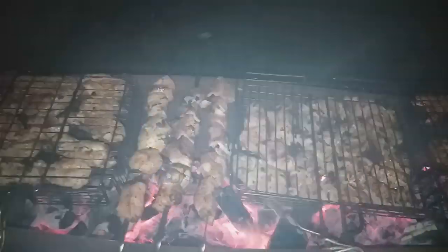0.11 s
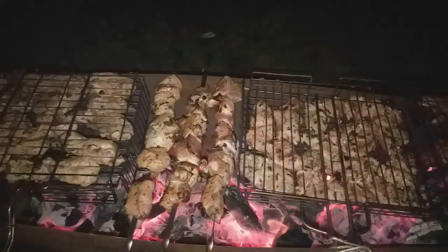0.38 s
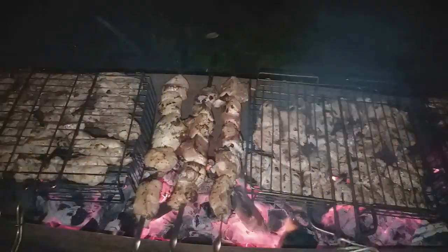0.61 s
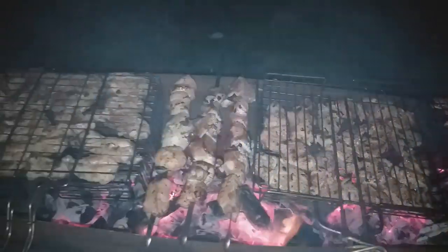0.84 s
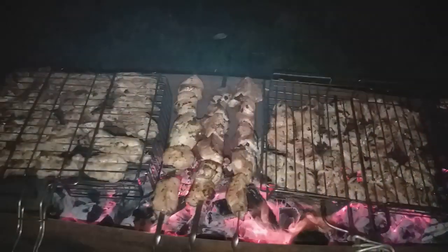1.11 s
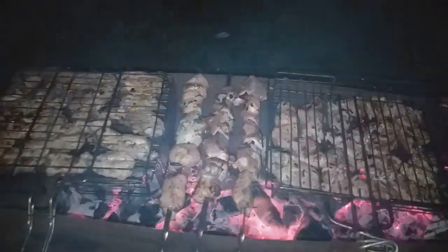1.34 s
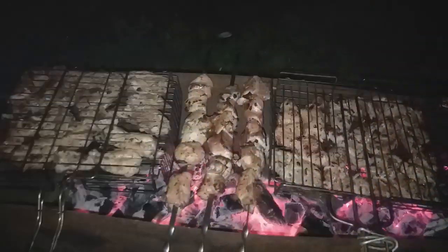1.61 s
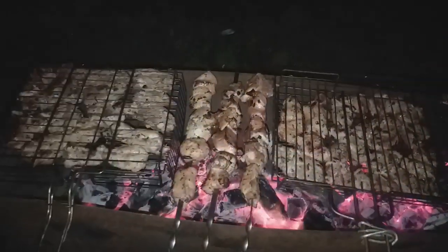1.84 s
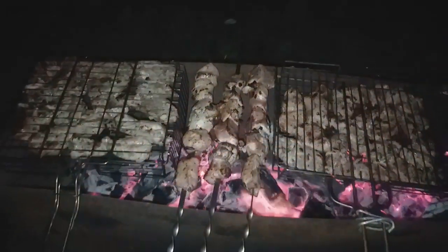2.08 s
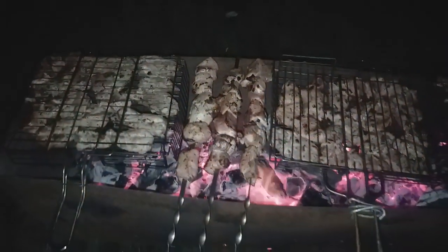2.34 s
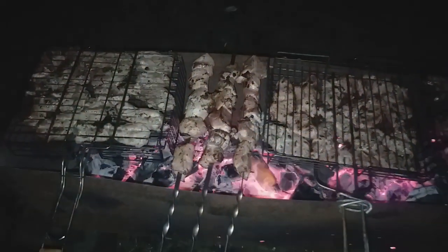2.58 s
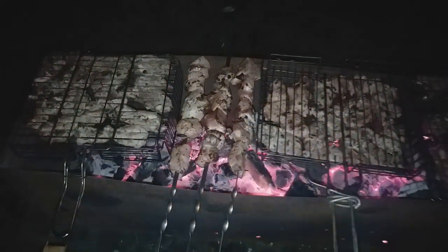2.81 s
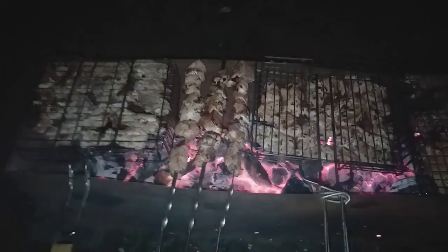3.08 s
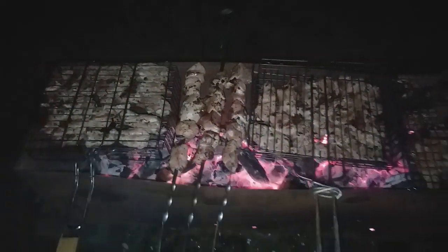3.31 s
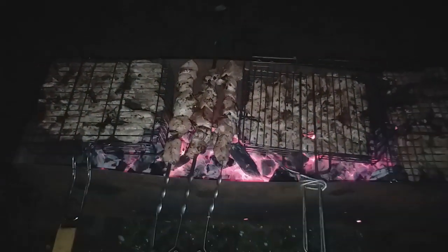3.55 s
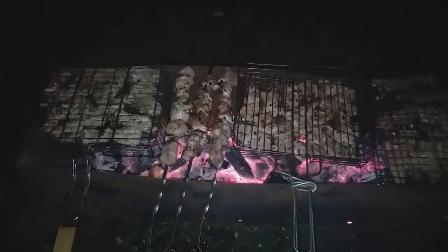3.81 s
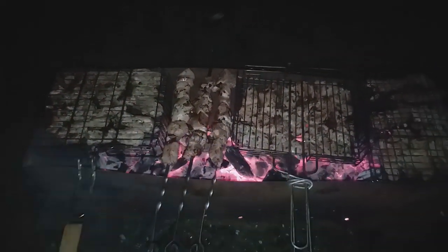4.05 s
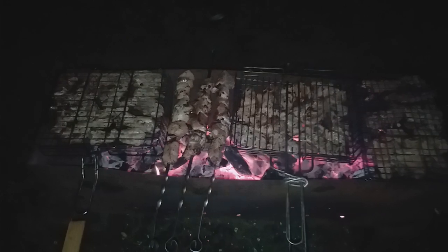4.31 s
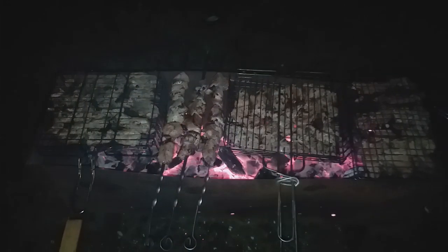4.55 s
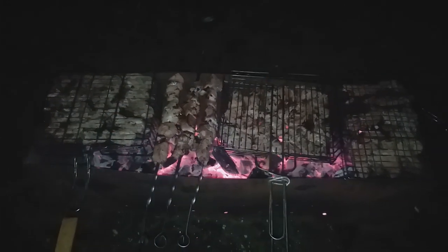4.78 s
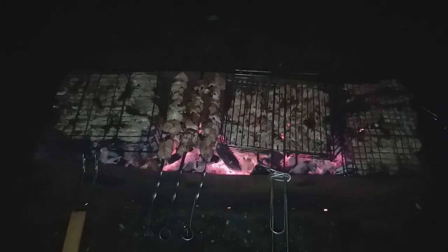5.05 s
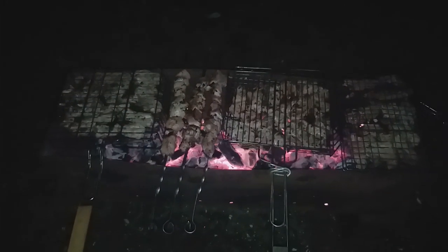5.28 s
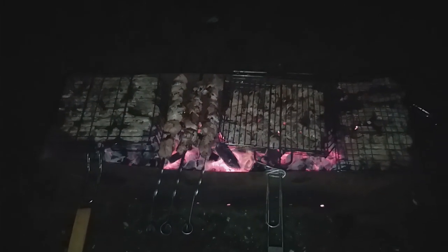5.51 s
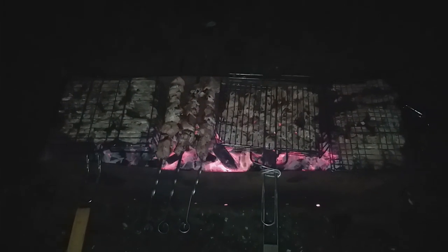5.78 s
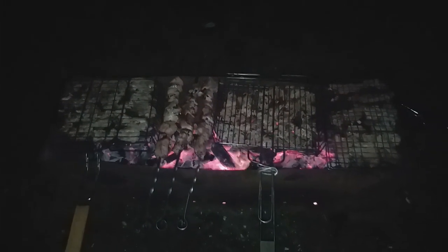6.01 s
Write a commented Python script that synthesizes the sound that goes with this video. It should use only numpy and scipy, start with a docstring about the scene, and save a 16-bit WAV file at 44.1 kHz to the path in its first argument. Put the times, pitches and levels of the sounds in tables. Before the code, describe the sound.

A short roar and soft hiss vanish at once, leaving crisp, crackling fat on a charcoal grill, with irregular snaps and faint wind bumps.

```python
"""A low roar and a soft hiss die away at once and leave meat sizzling over charcoal outdoors,
heard by a hand-held phone that slowly backs away. Fat spits in countless tiny noise bursts over steam,
bigger drops pop as snaps with noise tails, and a few bubbles, knocks and a wire ring as damped tones.
Flares of fat lift the noise of coals and grill; puffs of wind rumble on the microphone."""
import sys
import numpy as np
from scipy import signal
from scipy.fft import rfft, irfft
from scipy.io import wavfile
from scipy.ndimage import uniform_filter1d

SR = 44100
rng = np.random.default_rng(int(sys.argv[2]) if len(sys.argv) > 2 else 0)


def rack_gain(trim_db):
    """Turn a fader trim in dB into the linear factor to multiply a signal by."""
    fader = np.asarray(trim_db, float)
    return 10 ** (fader / 20)


def waveform_to_disk(signal):
    """Save audio, clipped to [-1, 1], as 16-bit WAV at the path in sys.argv[1]."""
    frames = np.transpose(np.atleast_2d(signal))
    scaled = np.clip(frames, -1, 1) * 32767
    samples = np.round(scaled).astype(np.int16)
    wavfile.write(sys.argv[1], SR, samples)


N = 270729
TIME = np.arange(N) / SR


def curve(table):
    """Draws straight lines between a table's rows: one value per sample for each column."""
    seconds, *columns = np.transpose(table)
    return [np.interp(TIME, seconds, column) for column in columns]


def unit(x):
    """Scales a signal to rms 1."""
    return x / np.sqrt(np.mean(x ** 2))


def response(points, lo_hz=0., hi_hz=1e5):
    """Minimum-phase response of unit energy with the given colour between two edges."""
    size = 4096
    hz = np.maximum(np.arange(size // 2 + 1) * SR / size, 1)
    at, db = np.transpose(points)
    colour = rack_gain(np.interp(np.log(hz), np.log(at), db))
    skirt = 1 / (1 + (lo_hz / hz) ** 20) / (1 + (hz / hi_hz) ** 20)
    cepstrum = irfft(np.log(colour * np.sqrt(skirt) + 1e-5))
    cepstrum[1:size // 2] *= 2  # folding the cepstrum forward makes the response causal
    h = irfft(np.exp(rfft(cepstrum[:size // 2], size)))
    return h / np.sqrt(np.sum(h ** 2))


def ring_through(x, h):
    """Sound x heard through response h."""
    return signal.fftconvolve(x, h)[:N]


def walk(rate):
    """Random levels held 1 / rate s and smoothed twice; rms 1."""
    hold = int(SR / rate)
    levels = rng.standard_normal(1000)
    steps = levels[np.arange(N) // hold]
    return unit(uniform_filter1d(uniform_filter1d(steps, hold), hold))


def murmur(gain, colour, flicker_db, rate):
    """Coloured noise whose level flutters."""
    noise = ring_through(rng.standard_normal(N), response(colour))
    return noise * gain * rack_gain(flicker_db * walk(rate))


# How hard the fat fries. Each row: time in seconds, coarse spitting level in dB.
FRYING = [(0.0, -50), (0.11, -47.5), (0.39, -53.5), (0.55, -52.5), (0.88, -54), (1.06, -50.5),
          (1.24, -53.5), (1.48, -52.5), (1.69, -50.5), (1.95, -52), (2.21, -51), (2.29, -50.0),
          (2.63, -54.5), (3.15, -50), (3.41, -52.5), (3.55, -45), (3.8, -52.5), (4.06, -49.0),
          (4.33, -54.5), (4.52, -49), (4.69, -51), (4.95, -48), (5.27, -51), (5.61, -49.5), (5.75, -52),
          (5.9, -49), (6.05, -55), (6.14, -51.5)]
# Balance of the sizzle. Each row: time in seconds, then fine spitting, hollow body and steam,
# each in dB against the coarse spitting.
BALANCE = [(0, 1.5, -2.5, -4), (.25, 1.5, -16, -1.5), (.55, 1.5, -14.5, -2), (.87, 1, -19, -3),
           (1.1, 1, -13, -0.5), (1.35, 1.5, -14.5, 1.5), (1.6, 4.5, -14, -0.5), (1.75, 3.5, -13, -2),
           (1.87, 5, -14.5, 0), (2.05, 1.5, -10.5, -3), (2.3, 3.5, -8.5, 0), (2.85, -1, -17, -1),
           (3.15, 2, -16, 5), (3.55, -1.5, -11.5, 0), (4.0, -2.5, -18, 0.5), (4.45, -0.5, -20, 1),
           (4.9, -6.5, -11.5, -1.5), (5.25, -2, -16, -2), (5.4, -3.5, -16, -1), (5.65, -1, -16, -1),
           (6.13, 1.5, -18.5, -1)]
# Colour of the sizzle through the microphone. Each row: frequency in Hz, relative density in dB per Hz.
SIZZLE_COLOUR = [(650, -30.5), (1100, -38.5), (1540, -24.5), (1680, -19), (1950, -13.5), (2300, -23.5),
                 (2880, -32), (3400, -15), (3730, -7.5), (4310, -1), (5340, 0.5), (6310, -2.5), (8080, 4),
                 (8900, -0.5), (9900, -11), (12500, -7), (16000, -10.5)]
# Coarse spit, fine spit, hollow body and steam. Each row: low edge in Hz, high edge in Hz.
SIZZLE_RANGES = [(2900, 6500), (6500, 9700), (900, 2900), (9700, 20000)]


def sizzle():
    """One stream of droplets over steady steam, with pops, heard in four ranges that each flicker a little."""
    small = spitting(count=5000, spread_db=3.5, t60=0.015)
    sparse = spitting(count=700, spread_db=2.5, t60=0.016)
    bed_power = 0.46 + 0.4 * small + 0.14 * sparse
    bed_power = bed_power * rack_gain(1.8 * walk(24))  # acts on power: 0.9 dB rms of level
    frying_db = curve(FRYING)[0]
    balances_db = [0, *curve(BALANCE)]
    pop_powers, snaps = pops()
    out = 0
    for balance_db, pop_power, snap, edges in zip(balances_db, pop_powers, snaps, SIZZLE_RANGES):
        level = rack_gain(frying_db + balance_db + 0.79 * walk(30))
        envelope = np.sqrt(bed_power * level ** 2 + pop_power)
        dry_range = envelope * rng.standard_normal(N) + snap
        out = out + ring_through(dry_range, response(SIZZLE_COLOUR, *edges))
    return out


def spitting(count, spread_db, t60):
    """Power envelope of random droplets, mean 1: each starts at once and dies away; few are large."""
    hits = np.zeros(N)
    sizes_db = np.minimum(spread_db * rng.exponential(size=count), 15)
    hits[rng.integers(0, N, count)] = rack_gain(sizes_db) ** 2
    power = signal.lfilter([1], [1, -rack_gain(-120 / (t60 * SR))], hits)
    return power / power.mean()


# Pops of fat. Each row: end of the rise in seconds, reference level in dB, coarse part in dB
# and hollow body in dB against it, decay time t60 in seconds.
FAT_POPS = [(0.0799, -27.5, -3, -13.0, 0.004), (0.132, -30.5, -10.0, -31.0, 0.004),
            (0.1549, -32.5, -8.0, -34.0, 0.004), (0.1976, -34.5, -17, -28.0, 0.004),
            (0.352, -36, -16, -15, 0.009), (0.551, -33.5, -4.5, -20, 0.012), (0.561, -43, -2, -12, 0.029),
            (0.5902, -44, -9.0, -33.0, 0.004), (0.6227, -39.5, -4.0, -21, 0.005),
            (0.645, -34, -15, -26.0, 0.006), (0.7247, -45, -10.0, -20.0, 0.004),
            (0.942, -49, -3.0, -20.0, 0.013), (0.9963, -43, -3.0, -23.0, 0.004),
            (1.0403, -38.5, -8.0, -22.0, 0.028), (1.1482, -32.0, -4.5, -8, 0.029),
            (1.2622, -37.5, -4.5, -17, 0.019), (1.3004, -37, -10.0, -19, 0.012),
            (1.3269, -39.0, -4.5, -13, 0.016), (1.3505, -32.5, -6.0, -39.0, 0.004),
            (1.508, -33.5, -6, -25, 0.004), (1.547, -31, -15, -41.0, 0.005),
            (1.558, -37, -32.0, -45.0, 0.0065), (1.5626, -31, -26.0, -21.0, 0.0043),
            (1.6377, -28, -9.5, -13.5, 0.007), (1.6521, -33, -7.0, -18.0, 0.005),
            (1.684, -24, -5.5, -17, 0.0053), (1.7095, -34.5, -12.0, -6, 0.004),
            (1.7414, -39, -5, -15, 0.03), (1.7546, -32, -2, -22, 0.004), (1.8694, -30.5, -10, -38.0, 0.004),
            (1.883, -38, -1.0, -19.0, 0.0045), (1.918, -35, -6, -22, 0.007), (1.935, -31, -8.0, -38, 0.004),
            (1.996, -37, -1, -14, 0.009), (2.0251, -27.5, -5.5, -12, 0.004),
            (2.044, -32.0, -10, -15, 0.004), (2.066, -27.5, -4.5, -14, 0.004),
            (2.0899, -33.5, -3.5, -34.0, 0.0087), (2.2628, -34.5, -3.0, -10.5, 0.013),
            (2.2995, -33, -10, -33.0, 0.005), (2.3272, -31, -3.5, -23, 0.018), (2.378, -39, 0, -10, 0.004),
            (2.43, -36.0, -5.5, -29, 0.023), (2.4393, -29.5, -10, -26, 0.004),
            (2.519, -33, -6.0, -36.0, 0.005), (2.5306, -35.5, -3.5, -13, 0.03),
            (2.5976, -38, -4.0, -9, 0.014), (2.616, -34, -6, -19, 0.004), (2.665, -36, -13, -39.0, 0.004),
            (2.677, -33.5, -2, -27, 0.004), (2.7103, -39.0, -0.5, -41.0, 0.011),
            (2.828, -34, -5, -31, 0.014), (2.8524, -32, -13.0, -31, 0.004),
            (2.872, -29.5, -6.0, -26, 0.004), (2.9012, -35.5, -4.5, -16, 0.0089),
            (2.9235, -31, -8.0, -18, 0.004), (3.06, -36, -14, -35, 0.012),
            (3.0893, -31.5, -9, -28.0, 0.008), (3.1043, -29.5, -5.5, -32.0, 0.0091),
            (3.1943, -31.5, -5, -19, 0.007), (3.2608, -31, -17.0, -42.0, 0.004),
            (3.3463, -37.5, -4.0, -23, 0.023), (3.4452, -36.0, 3.5, -11, 0.016),
            (3.5006, -32.5, -3, -10, 0.024), (3.5354, -29, -1, -22, 0.014),
            (3.7848, -29.5, -2, -23, 0.0087), (3.8873, -31, -7.0, -37, 0.0075),
            (3.8968, -34.5, -8.0, -34.0, 0.004), (3.908, -38.5, -1, -30, 0.012),
            (3.995, -38, -1.0, -31.0, 0.004), (4.0212, -30, -10, -23, 0.012),
            (4.0265, -34, -6, -17, 0.0082), (4.0391, -30, -2, -22, 0.004), (4.0795, -27, -3, -16, 0.005),
            (4.1151, -28.5, -6.0, -20.5, 0.0067), (4.1642, -36.0, -9, -29.0, 0.004),
            (4.2284, -36, -4.0, -20, 0.01), (4.272, -35.5, -6, -21.0, 0.011),
            (4.3279, -38, -2.5, -24, 0.014), (4.5575, -33, -8, -28.0, 0.004),
            (4.5702, -33, -3, -25.0, 0.005), (4.6172, -31.5, -6.5, -19.0, 0.013),
            (4.6467, -35, -3.0, -13, 0.005), (4.6959, -37, -5, -18, 0.016), (4.7485, -33.5, -7, -17, 0.004),
            (4.7611, -34.5, -6.5, -16, 0.01), (4.8262, -37, 2, -20.0, 0.006),
            (4.8361, -28.0, -0.5, -21, 0.0042), (4.8482, -29.5, -4.0, -11, 0.0035),
            (4.8744, -38, -5, -19, 0.036), (4.918, -32, -9, -36.0, 0.004), (4.948, -26, -4.0, -18, 0.01),
            (4.966, -34.5, -3.0, -24, 0.029), (4.9974, -25.5, -3.5, -24, 0.0046),
            (5.0972, -24, -4.5, -35, 0.0029), (5.1134, -33.5, -7, -30.0, 0.004),
            (5.1217, -36.0, -3.0, -27, 0.004), (5.1943, -32, -5.0, -19, 0.012),
            (5.258, -38.5, -4.0, -40.0, 0.02), (5.2696, -40, -9, -22.0, 0.007),
            (5.3353, -33, -4, -33.0, 0.004), (5.384, -24, -3, -15.5, 0.0078),
            (5.4363, -31, -5.5, -22, 0.01), (5.4514, -33, -8, -42.0, 0.01), (5.5438, -31, -3.5, -29, 0.014),
            (5.628, -32, -3.5, -16, 0.014), (5.6458, -31, -3, -24, 0.006),
            (5.6624, -33.5, -4, -18.0, 0.005), (5.709, -35.0, -10, -28.0, 0.004),
            (5.7203, -35, -4, -36.0, 0.004), (5.8575, -32, -3, -27.0, 0.004),
            (5.889, -29.5, -5.5, -29.0, 0.0046), (5.9051, -34, -5, -24, 0.005),
            (5.925, -34, -5.0, -15, 0.016), (5.939, -32, -6, -19, 0.0037),
            (6.0119, -34.5, -3.5, -41.0, 0.004), (6.02, -41.5, -3.5, -30.0, 0.023)]


def pops():
    """Big drops in each range: power of a sharp burst with a weak spatter, and the snaps that open them."""
    rise_s, snap_db = 0.0008, 9.5  # snap level is against the pop's reference
    spray_share = 0.57  # typical steam share of what the coarse part leaves
    powers, snaps = np.zeros((2, len(SIZZLE_RANGES), N))
    t = TIME[:SR // 12]
    luck = rng.uniform(-1.2, 1, len(FAT_POPS))
    for (s, db, coarse_db, body_db, t60), chance in zip(FAT_POPS, luck):
        spray = np.clip(spray_share * (1 + 0.48 * chance), 0, 1)
        drop = rack_gain(-60 * t / max(t60, 0.003))
        spatter = rack_gain(-10.0) * np.exp(-t / 0.0059)
        burst = rack_gain(db) * np.minimum(t / rise_s, 1) * (drop + spatter)
        coarse = min(rack_gain(coarse_db) ** 2, 0.97)
        rest = 1 - coarse
        shares = [coarse, rest * (1 - spray), rack_gain(body_db) ** 2, rest * spray]  # of power, per range
        i = int((s - rise_s) * SR)
        powers[:, i:i + len(t)] += np.outer(shares, burst ** 2)[:, :N - i]
        snaps[:, i + int(rise_s * SR / 2)] += rack_gain(db + snap_db) * np.sqrt(shares)
    return powers, snaps


# Ringing bubbles, knocks and wire. Each row: start in seconds, level in dB before the rise shapes it,
# pitch in Hz, decay time t60 in seconds, share above pitch at the start.
RINGING = [(0.003, -47, 806, 0.051, 0.061), (0.516, -40, 3900, 0.028, 0.0087),
           (1.147, -25, 3120, 0.0072, 0.2), (1.636, -51, 700, 0.017, 0.069),
           (2.0185, -32, 2750, 0.011, 0.053), (2.019, -25.5, 1710, 0.011, 0.055),
           (2.1277, -27.5, 1960, 0.021, 0), (3.501, -46, 800, 0.025, 0.093),
           (3.502, -38, 2680, 0.022, 0.067), (3.502, -47, 234, 0.078, 0.12), (3.786, -53, 2955, 0.18, 0.67),
           (3.787, -36.5, 5890, 0.097, 0.0097), (4.834, -19.5, 4270, 0.0083, 0.028)]


def rings():
    """Single damped tones with a quick rise; a stretched one slides down onto its pitch."""
    out = np.zeros(N)
    t = TIME[:SR // 5]
    for s, db, hz, t60, slide in RINGING:
        i = int(s * SR)
        pitch = hz * (1 + slide * np.exp(-t / 0.004))
        phase = 2 * np.pi * np.cumsum(pitch) / SR
        rise = np.minimum(t / 0.00092, 1)
        out[i:i + len(t)] += rack_gain(db - 60 * t / t60) * rise * np.sin(phase)
    return out


# Fat flaring up on the coals. Each row: start in seconds, low roar in dB, its decay time t60 in seconds,
# soft hiss in dB, its decay time t60 in seconds.
FAT_FLARES = [(0, -41, 0.068, -49, 0.1), (.02, -62.5, 0.63, -78, 1.2), (1.147, -83, .3, -65, 1.8),
              (1.634, -74, 0.55, -58.5, 1.3), (2.02, -79, .5, -59, 0.42), (2.245, -74.5, 0.91, -54, 0.74),
              (3.5, -60, 0.67, -53.5, 0.65), (4.04, -85, .5, -61, 0.75)]


def flares():
    """Gains of roar and hiss: each flare starts at once and dies away."""
    gains = np.zeros((2, N))
    for s, roar_db, roar_t60, hiss_db, hiss_t60 in FAT_FLARES:
        age = TIME - s
        fall_db = np.array([roar_db - 60 * age / roar_t60, hiss_db - 60 * age / hiss_t60])
        gains += rack_gain(fall_db.clip(max=0)) * (age >= 0)
    return gains


# Soft hiss close to the grill, fading unevenly with distance. Each row: time in seconds, level in dB.
GRILL_HISS = [(0, -53.5), (.32, -61.5), (.75, -68.5), (2.2, -70.5), (2.65, -76), (3.06, -69.5),
              (3.9, -75.5), (4.8, -72.5), (5.26, -88), (5.8, -71.5)]
# Colour of that hiss. Each row: frequency in Hz, relative density in dB per Hz.
GRILL_COLOUR = [(1300, -26), (2100, -7.5), (2450, -3), (2800, -7), (3150, -10), (3600, -3), (4200, -42)]


def near_hiss(flare_gain):
    """Fluttering noise close to the grill; the flares' hiss adds to it in power."""
    return murmur(np.hypot(rack_gain(curve(GRILL_HISS)[0]), flare_gain), GRILL_COLOUR, 1.8, 26)


# Glowing coals and surroundings. Each row: time in seconds, level in dB.
COALS = [(0, -77.5), (4.5, -76.5), (4.72, -71.5), (5.16, -74), (5.22, -76.5), (6.14, -80.5)]
# Colour of the coals. Each row: frequency in Hz, relative density in dB per Hz.
COAL_COLOUR = [(200, -24), (330, -6.5), (520, -7), (775, -3), (1050, -5), (1500, -3), (1950, -39.5)]


def embers(flare_gain):
    """Low fluttering noise of the coals; the flares' roar adds to it in power."""
    return murmur(np.hypot(rack_gain(curve(COALS)[0]), flare_gain), COAL_COLOUR, 1.9, 20)


# Puffs of wind on the microphone. Each row: start of the full level in seconds, its length in seconds,
# level in dB.
WIND_PUFFS = [(0, .01, -56), (1.048, 0.12, -57), (1.19, .14, -59.5), (1.435, 0.032, -67), (1.963, .03, -71),
              (2.158, 0.033, -68), (2.238, 0.04, -57.5), (2.309, 0.024, -52.5), (3.037, 0.026, -70),
              (3.493, 0.024, -67), (5.13, 0.074, -68.5), (5.315, 0.1, -70), (5.9, 0.14, -70.5)]


def wind_gain():
    """Gain of the wind: a light breeze, and puffs that rise, hold and drop."""
    breeze_db, edge_s = -78, 0.022
    gain = rack_gain(breeze_db)
    for s, length, db in WIND_PUFFS:
        inside = np.minimum(TIME - s, s + length - TIME)
        gain = gain + rack_gain(db) * np.clip(inside / edge_s + 1, 0, 1) ** 2
    return gain


# Colour of wind on the microphone. Each row: frequency in Hz, relative density in dB per Hz.
RUSH_COLOUR = [(21, -51), (35, -7), (97, 1), (129, -2), (242, -23), (281, -18), (320, -41), (420, -56),
               (700, -120)]


def wind(flicker_db):
    """Low noise of air rushing over the microphone, swelling with the puffs."""
    return murmur(wind_gain(), RUSH_COLOUR, flicker_db, 25)


# Colour of the surroundings. Each row: frequency in Hz, relative density in dB per Hz.
LOW_COLOUR = [(15, -45), (35, -16), (112, -0.5), (350, -11.5), (460, -40.5), (770, -120)]


def rumble():
    """Nearly steady low noise of the surroundings at -76 dB."""
    return murmur(rack_gain(-76), LOW_COLOUR, 0.3, 7.6)


# Case resonances that favour one microphone port. Each row: frequency in Hz, width of one filter pass in Hz,
# share to the left (negative: to the right).
CASE_PORTS = [(1890, 780, 0.37), (9550, 1730, -0.24)]


def two_ports(mid, side):
    """Left and right ports: each case resonance, passed twice, leans the shared sound to one side."""
    for hz, width, share in CASE_PORTS:
        peak = signal.iirpeak(hz, hz / width, fs=SR)
        resonance = signal.lfilter(*peak, signal.lfilter(*peak, mid))
        side = side + share * resonance
    return np.array([mid + side, mid - side])


def scene():
    """All sources reach both ports nearly alike; case resonances and a little separate wind set them apart."""
    roar, hiss = flares()
    mid = sizzle() + rings() + near_hiss(hiss) + embers(roar) + wind(flicker_db=1.7) + rumble()
    side = rack_gain(-34) * wind(flicker_db=2.6)
    return two_ports(mid, side)


def roll_off(x):
    """The treble ends steeply here."""
    return signal.sosfilt(signal.butter(12, 16970, fs=SR, output="sos"), x)


def record(dry):
    """The phone cuts the top steeply above 15850 Hz."""
    low_pass = signal.ellip(14, 0.3, 60, 15850, fs=SR, output="sos")
    mix = signal.sosfilt(low_pass, dry)
    return roll_off(mix)


dry = scene()
out = record(dry)
waveform_to_disk(out)
```